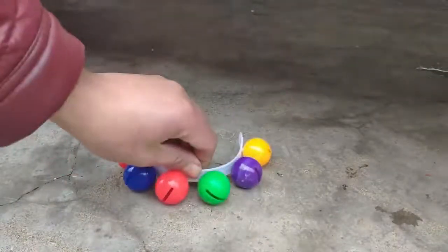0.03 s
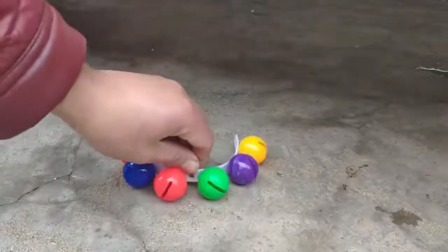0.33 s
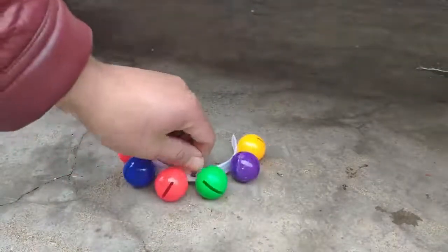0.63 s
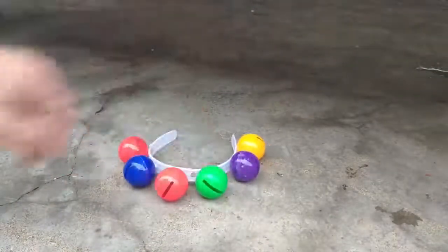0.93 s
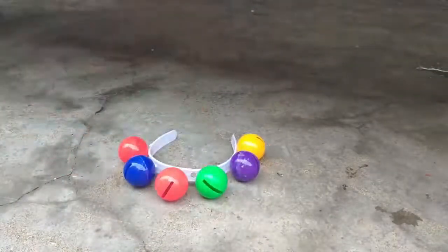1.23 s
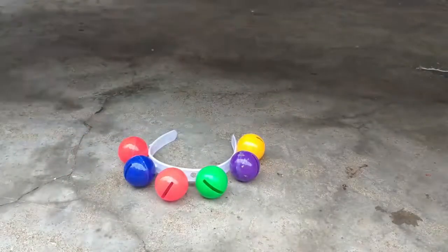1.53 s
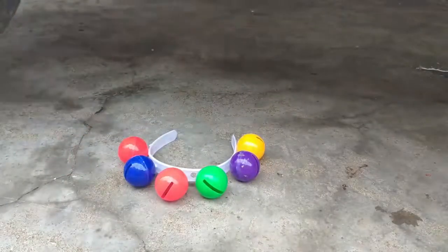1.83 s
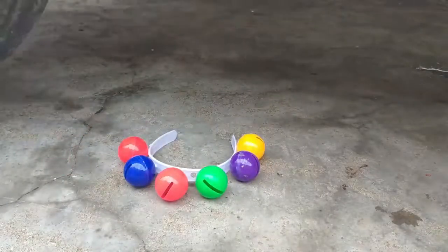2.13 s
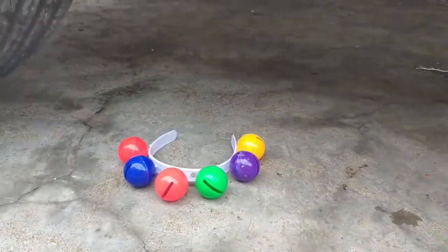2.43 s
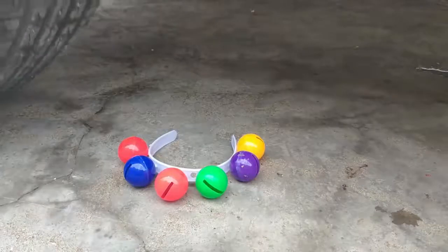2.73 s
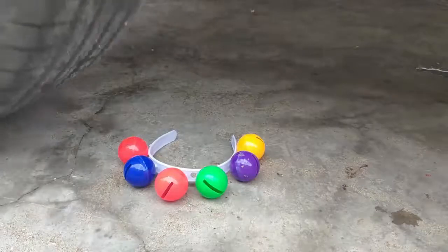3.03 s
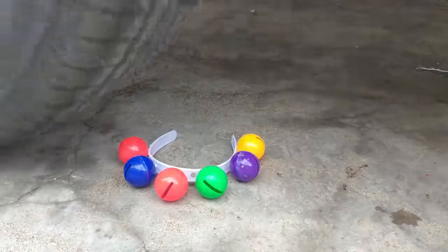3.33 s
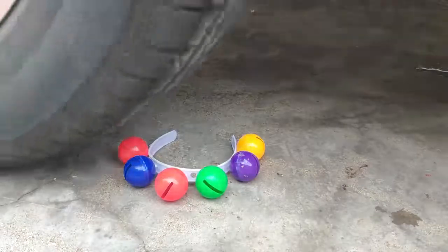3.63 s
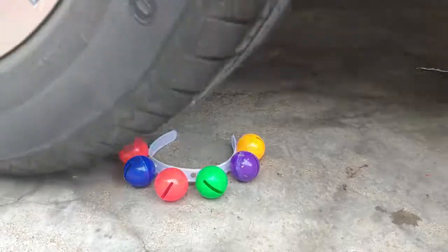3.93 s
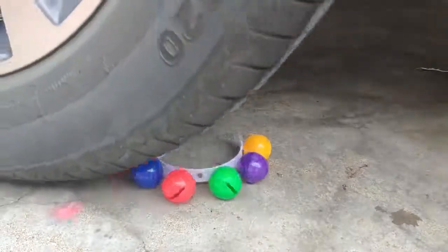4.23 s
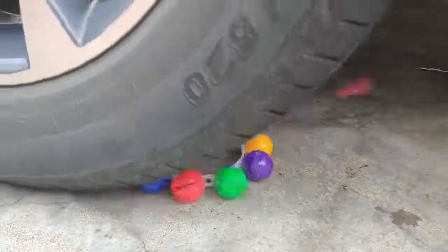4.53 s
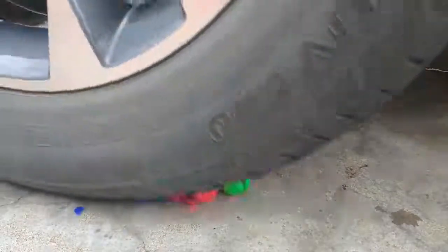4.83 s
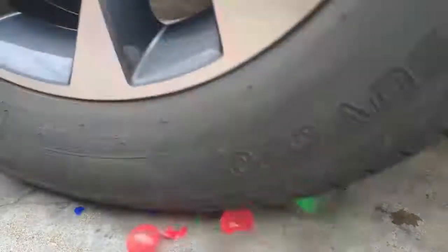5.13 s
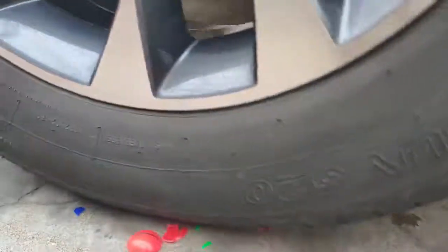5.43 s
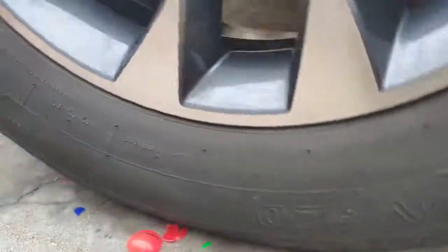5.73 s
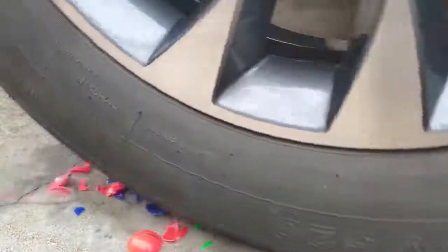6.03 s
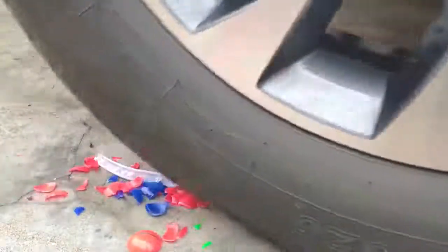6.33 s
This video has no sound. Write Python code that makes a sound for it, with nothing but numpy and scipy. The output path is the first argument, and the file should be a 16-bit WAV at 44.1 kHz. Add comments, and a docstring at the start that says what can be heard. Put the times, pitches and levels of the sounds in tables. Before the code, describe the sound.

Hollow clacks and a light rattle of bells sound as a plastic bracelet lands on concrete, over a car's soft idle. The engine takes up load with a low drone and faint whirr. Then the hard balls snap one after another under the tyre, each crack echoing briefly beneath the car, and thin out into crunching splinters. The loudest blows make the close microphones thump and choke, left and right separately.

```python
"""A car tyre bursts the small hard bell balls of a bracelet one by one and grinds the shards.
First the bracelet is set down on concrete and jingles; the car idles, then creeps up under load.
Each shell snaps, the tyre thuds down on it, and the crack rings on beneath the car.
The blows overload both close microphones, which thump and choke for moments, each on its own."""
import sys
import numpy as np
from scipy import signal
from scipy.fft import rfft, irfft, next_fast_len
from scipy.io import wavfile
from scipy.ndimage import map_coordinates

SR = 44100
rng = np.random.default_rng(int(sys.argv[2]) if len(sys.argv) > 2 else 0)


def materialize(psi):
    """Save the field psi as 16-bit PCM at rate SR to the path in sys.argv[1].

    A 1-D psi becomes a single channel; in a 2-D psi each row is a channel.
    """
    bounded = np.clip(np.atleast_2d(psi).T, -1, 1)
    quanta = np.round(bounded * 32767).astype(np.int16)
    wavfile.write(sys.argv[1], SR, quanta)


N = 285327

# modes of one ball: pitch_hz, level_db, t60_s
LOW_BELL = [(2400, 5, 0.15), (2940, -18, 0.148), (5820, 4.5, 0.13)]
# a ball tuned slightly higher: pitch_hz, level_db, t60_s
HIGH_BELL = [(2424, 2.5, 0.084), (2515, -2.5, 0.055), (6120, -10, 0.13), (8240, -6.5, 0.077),
             (10350, -17, 0.072)]
# a shell or large shard breaks: start_s, strength_db, left_minus_right_db, tilt_db_per_octave
CRACKS = [(4.1526, -14, -2, 2), (4.1806, -1.5, 3, -1.7), (4.25, -16.5, 8, -0.5), (4.264, -8, -14, -3.8),
          (4.2919, -6, 8, -1), (4.471, -22.5, 37, -3), (4.5187, -11.5, -3.5, 0), (4.542, -6.5, -5, -2.5),
          (4.5678, -12, 15, -3.5), (4.613, -20.5, 23, -1), (4.6227, -10.5, -10, 2), (4.6286, -8, 9, -2.5),
          (4.7499, -3, 7, -3), (4.782, -19, -47, -4), (4.8237, -21, -38, -2), (4.852, -16.5, -23, -2),
          (4.9038, -12, 3.5, -1.5), (4.917, -3, 7, -1), (4.992, -25, 22, -1.5), (5.0062, -15.5, 19, -2.5),
          (5.017, -10.5, -14, -2), (5.0391, -2.5, 21, -1.5), (5.0486, -15, 0, -2), (5.051, -10, 15, -3),
          (5.073, -5, -37, -4.5), (5.08, -18, -19, -4), (5.0972, -21, -35, -8), (5.107, 8, -16.5, -2),
          (5.124, -11.5, -12, -5.5), (5.1571, -2, -17, -4), (5.168, -15, -25, -4), (5.1831, 2.5, -12, -5),
          (5.2045, -5.5, 1, 0), (5.251, 3.5, 2.5, 0), (5.2925, -5, -13, -0.5), (5.2966, -10.5, 4, -4.5),
          (5.3272, -1, -7, -1.5), (5.352, -11, -5, -2.5), (5.368, -1, -2.5, 0), (5.4007, -4, -6, -0.5),
          (5.4207, -12, -8, 3), (5.4403, -9.5, 10, -0.5), (5.4542, -19, 25, 2), (5.5087, -12.5, 27, 0),
          (5.527, -12.5, -2, -4.5), (5.5386, -7, 14, -1), (5.557, -5, 18, 0), (5.583, -18, 13, -0.5),
          (5.5999, -11, 26, 1), (5.622, -25, 34, -2), (5.6588, -8, -1, -2), (5.6642, -11.5, -10, -2),
          (5.714, -9.5, 2.5, -4), (5.724, -11, -2, -3), (5.7295, -10, 8, 0.5), (5.7757, -11.5, -1.5, -1),
          (5.782, -4.5, -3, 0), (5.7906, -9, -8, -7), (5.8042, -13.5, -7, -0.5), (5.8535, -19, -5, -3),
          (5.8763, -8.5, 5, -1.5), (5.8943, -17.5, 20, -6), (5.944, -15.5, -9, 4), (5.965, -18, -8, -5),
          (5.9826, -12.5, -2, 3.5), (6.009, -15, -11, -0.5), (6.047, -10.5, -6, -2.5),
          (6.131, -15, -11, -1.5), (6.2625, -21, -6, -4)]
SNAP_CEILING_DB = -8  # stronger cracks snap no louder, they only echo more


def amp(db):
    """Decibels to gain."""
    return 10 ** (np.asarray(db) / 20)


def unit(x):
    """Scale to rms 1."""
    return x / np.sqrt(np.mean(x ** 2) + 1e-20)


def along(points, hz):
    """Interpolate (hz, value) points on a log axis."""
    knots_hz, values = np.transpose(points)
    return np.interp(np.log(hz + 1), np.log(knots_hz + 1), values)


def curves(rows):
    """One value per sample for each column after the time."""
    time_s, *columns = np.transpose(rows)
    return [np.interp(np.arange(N) / SR, time_s, column) for column in columns]


def wobble(knots_per_s):
    """Smooth random curve."""
    knots = rng.standard_normal(int(N * knots_per_s / SR) + 4)
    return map_coordinates(knots, [np.arange(N) * knots_per_s / SR])


def scattered(length_s, per_s):
    """Uneven times within length_s."""
    count = int(length_s * per_s)
    return (np.arange(count) + rng.uniform(size=count)) / per_s


def filtered(x, response):
    """Multiply the spectrum by response(hz)."""
    n = x.shape[-1]
    size = next_fast_len(n + SR // 10)
    return irfft(rfft(x, size) * response(np.fft.rfftfreq(size, 1 / SR)), size)[..., :n]


def causal(x, gain_db):
    """Minimum-phase filter; attacks stay sharp."""
    n = x.shape[-1]
    size = 2 * next_fast_len(n)
    cepstrum = irfft(np.log(amp(gain_db(np.fft.rfftfreq(size, 1 / SR)))), size)
    cepstrum[..., 1:size // 2] *= 2
    cepstrum[..., size // 2 + 1:] = 0
    return irfft(rfft(x, size) * np.exp(rfft(cepstrum)), size)[..., :n]


def add(track, start_s, sound):
    """Mix a sound into the track."""
    part = track[..., max(round(start_s * SR), 0):][..., :sound.shape[-1]]
    part += sound[..., :part.shape[-1]]


def heard_from_bay(pair):
    """The left microphone catches far less of the engine bay's top treble than the right."""
    # bay balance: freq_hz, left_minus_right_db
    balance = [(60, 15.5), (110, 0.5), (380, -3), (3700, -2), (6300, 2.5), (8120, -21), (9500, -24),
               (14000, -17)]
    return filtered(pair, lambda hz: np.sqrt(2 / (1 + amp(np.outer([-2, 2], along(balance, hz))))))


def fan(load_s, rise_s=0.047, idle_db=-41, load_db=-39.5, flutter_db=1.02, blade_hz=518, blade_db=-56):
    """Air rushes in the engine bay, alike on both sides in the bass, diffuse above; faint blade tone."""
    # rush spectrum: freq_hz, density_db
    colour = [(60, -18.5), (110, -2.5), (200, -5.5), (260, -11), (360, -8.5), (500, -5.5), (1040, -19),
              (1700, -14), (2600, -19), (3600, -18), (6600, -25), (8500, -17.5), (10000, -26.5),
              (15800, -28)]
    # likeness of left and right: freq_hz, correlation
    coherence = [(60, 0.99), (240, 0.98), (950, 0.02)]

    def mid_side_gain(hz):
        angle = np.arccos(along(coherence, hz)) / 2
        return amp(along(colour, hz)) * np.array([np.ones_like(hz), np.tan(angle)])

    mid, side = filtered(rng.standard_normal((2, N)), mid_side_gain)
    rush = unit(heard_from_bay(np.array([mid + side, mid - side])))
    blade_gain = amp(blade_db + 1.9 * wobble(3.6))
    blades = blade_gain * np.sin(2 * np.pi * np.cumsum(blade_hz + 2 * wobble(10)) / SR)
    level_db, = curves([(load_s, idle_db), (load_s + rise_s, load_db)])
    return blades + rush * amp(level_db + flutter_db * wobble(24.9))


def engine(load_s, idle_hz=92.1, left_delay_s=0.00045):
    """Firing orders; under load the fourth meets the exhaust resonance and swells with whirr and whine."""
    # exhaust boom under load: time_s, pitch_hz, level_db
    loaded = [(1.51, 135.3, -35), (1.69, 135.6, -34.5), (2.03, 129.8, -41.5), (2.57, 133.2, -35.5),
              (2.71, 129.8, -42.5), (3.32, 129.9, -40.5), (3.64, 137.1, -38), (4.12, 134.8, -37)]
    # boom past the bracelet: time_s, pitch_hz, level_db
    rolling_off = [(5.901, 135.4, -42.5), (6.4, 136, -36)]
    # weaker orders: firing_multiple, level_db
    orders = [(1, -5.5), (2, -14), (6, -14.5), (9, -18.5)]
    # belt-driven parts: boom_multiple, level_db
    belt_tones = [(12.2, -58), (13.4, -57), (15.68, -56)]
    # drive whirr spectrum: freq_hz, density_db
    whirr_colour = [(900, -11), (1300, 8), (1750, 11), (2200, 8.5), (2600, -8.5), (9800, -7.5), (11400, 1),
                    (13000, -7)]
    boom_hz, level_db = curves([(load_s, idle_hz, -55), *loaded, *rolling_off])
    effort_db = level_db - level_db.max()
    firing_phase = 2 * np.pi * np.cumsum(boom_hz / 4 * (1 + 0.002 * wobble(12))) / SR
    boom = amp(level_db - 2 + 0.54 * wobble(25)) * np.sin(4 * firing_phase)
    drone = sum(amp(db - 40 + wobble(10)) * np.sin(k * firing_phase + rng.uniform(0, 2 * np.pi))
                for k, db in orders)
    whine = sum(amp(db + effort_db + 3 * wobble(6.9)) * np.sin(4 * k * firing_phase)
                for k, db in belt_tones)
    hum = np.sqrt(2) * (boom + drone + whine)
    pair = filtered(hum, lambda hz: np.exp(-2j * np.pi * np.outer([left_delay_s, 0], hz)))
    whirr = unit(filtered(rng.standard_normal((2, N)), lambda hz: amp(along(whirr_colour, hz))))
    throb = 1 + 0.31 * np.sin(firing_phase)
    whirr *= throb * amp(-44 + 0.58 * effort_db + 1.2 * wobble(13))
    return pair * amp([[-1], [1]]) + heard_from_bay(whirr)


def set_down(t60_s=0.088):
    """The balls meet the concrete with brief, hollow clacks."""
    # ground contacts: start_s, level_db
    contacts = [(0.017, -26), (0.027, -21), (0.052, -23)]
    # clack spectrum: freq_hz, density_db
    colour = [(700, -38), (1700, 6.5), (2300, 14), (3500, -8), (9000, -18), (15000, -20)]
    out, t = np.zeros((2, N)), np.arange(SR // 10) / SR
    for start_s, db in contacts:
        clack = unit(filtered(rng.standard_normal((2, len(t))), lambda hz: amp(along(colour, hz))))
        add(out, start_s, amp(db - 60 * t / t60_s) * clack)
    return out


def bell_strike(modes, upper_db, detune=0.0081, scatter_db=6, rise_s=0.0007):
    """A slit ball rings, roughened by its chattering pellet; where that lands weights the upper modes."""
    t = np.arange(SR // 4) / SR
    ring = np.zeros((2, len(t)))
    for hz, db, t60_s in modes:
        chatter = np.interp(t, np.linspace(0, t[-1], 100), 0.4 * rng.standard_normal(100))
        pitch_hz = hz * (1 + detune * rng.uniform(-1.35, 1))
        phase = 2 * np.pi * pitch_hz * t + chatter + rng.uniform(0, 2 * np.pi, (2, 1))
        mode_db = db + (hz > 4000) * (upper_db + scatter_db * rng.uniform(-1, 1))
        ring += amp(mode_db - 60 * t / t60_s) * np.sin(phase)
    return ring * (1 - np.exp(-t / rise_s))


def bells(gain_db=-7, contacts_per_s=115, scatter_db=2):
    """Pellets strike their bells hard, then rattle lightly as the balls settle."""
    # hard strikes: start_s, level_db, upper_modes_db, ball
    jingles = [(0.025, -15, -24, LOW_BELL), (0.0563, -13, -10, HIGH_BELL), (0.079, -26, 7.5, HIGH_BELL),
               (0.3247, -27, -16, HIGH_BELL), (0.43, -22, -15, HIGH_BELL), (0.666, -38, 13, HIGH_BELL),
               (4.253, -12.5, -12, LOW_BELL), (4.3032, -7.5, -19, LOW_BELL), (4.3404, -12, -16, LOW_BELL),
               (4.349, -16.5, 1, LOW_BELL), (4.719, -20, -26, LOW_BELL)]
    # loose pellets: start_s, length_s, contact_db
    rattles = [(0.051, 0.04, -23), (0.099, 0.74, -37.5), (0.19, 0.055, -30.5), (0.451, 0.03, -29),
               (0.58, 0.045, -30.5), (4.464, 0.055, -29)]
    out = np.zeros((2, N))
    for start_s, db, upper_db, ball in jingles:
        add(out, start_s, amp(db + gain_db) * bell_strike(ball, upper_db))
    for start_s, length_s, db in rattles:
        for wait_s in scattered(length_s, contacts_per_s):
            gain = amp(db + gain_db + scatter_db * rng.standard_normal())
            add(out, start_s + wait_s, gain * bell_strike(HIGH_BELL, upper_db=-10))
    return out


def crack_colour_db(hz):
    """Spectrum of breaking shells at each microphone."""
    # left: freq_hz, density_db
    left = [(30, 3), (100, -4.5), (250, 7), (600, -0.5), (950, 1), (1250, -3), (1650, -3), (2400, -6),
            (4000, -4), (6500, -1.5), (7800, -9), (8900, -13), (10000, -18), (12000, -14.5), (15000, -4.5)]
    # right: freq_hz, density_db
    right = [(30, -23.5), (100, 7), (250, 0.5), (600, -1.5), (900, -3.5), (1250, -11.5), (1650, -9),
             (2400, -10), (4000, -11.5), (6500, -14.5), (7800, -6.5), (8900, 3), (10000, -9.5),
             (12000, -4.5), (15000, -7)]
    return np.array([along(left, hz), along(right, hz)])


def shard_colour(start_s, shell_hz=3570, flatten_s=0.13):
    """A random fragment's resonances, dB against Hz; the shells' hollow note fades as they flatten."""
    broad_hz = 2900 * np.exp(0.66 * rng.standard_normal((3, 1)))
    narrow_hz = rng.uniform(1000, 12000, size=(10, 1))
    shell_db = 9 * np.exp(-(start_s - CRACKS[0][0]) / flatten_s)

    def gain_db(hz):
        hump = lambda centre_hz: np.exp(-(np.log((hz + 1) / centre_hz) / 0.25) ** 2)
        modes_db = 7 / (1 + ((hz - narrow_hz) / 70) ** 2).min(0)
        return shell_db * hump(shell_hz) + 4 * hump(broad_hz).max(0) + modes_db

    return gain_db


def octaves(hz):
    """Octaves from the pivot of a fracture's spectral tilt."""
    return np.log2(np.clip(hz, 700, 10000) / 2500)


def snap(shard_db, tilt, mic_gain, t60_s=0.014, rise_s=0.00013):
    """Dry fracture noise, coloured by the freed shard; a choked microphone cuts it short."""
    t = np.arange(SR // 20) / SR
    noise = rng.standard_normal(len(t)) + 0.93 * rng.standard_normal((2, len(t)))
    colour = lambda hz: amp(crack_colour_db(hz) + 0.51 * shard_db(hz) + tilt * octaves(hz))
    choked_t60_s = t60_s * mic_gain ** 0.15
    burst = filtered(noise, colour) * amp(-60 * t / choked_t60_s) * (1 - np.exp(-t / rise_s))
    return burst / burst[:, :SR // 400].std(axis=1, keepdims=True)


def front(tilt, centre_hz=3880, spread=0.63):
    """The shard springs free: a steep swing that dies in a few cycles, faster for brighter cracks."""
    hz = centre_hz * 2 ** (0.23 * tilt) * np.exp(spread * rng.uniform(-1.01, 1, (2, 1)))
    cycles = hz * np.arange(SR // 100) / SR
    return np.sin(2 * np.pi * cycles) * np.exp(0.5 - 2 * cycles)


def under_car_echo(shard_db, tilt, grain_db=4, rise_s=0.00062):
    """A crack echoes between tyre and ground, grainy with splinters; each pitch dies at its own rate."""
    # decay under the car: freq_hz, t60_s
    decay = [(150, 0.066), (1000, 0.14), (15000, 0.18)]
    n = SR // 6
    t = np.arange(n) / SR
    grains = np.repeat(rng.standard_normal((2, n)), SR // 1000, axis=1)[:, :n]
    noise = rng.standard_normal((2, n)) * amp(grain_db * grains)
    bins_hz, age_s, spectra = signal.stft(noise, SR, nperseg=128)
    spectra *= amp(-60 * age_s / along(decay, bins_hz)[:, None])
    echo = signal.istft(spectra, SR, nperseg=128)[1][:, :n] * (1 - np.exp(-t / rise_s))
    echo = causal(echo, lambda hz: crack_colour_db(hz) + shard_db(hz) + 0.87 * tilt * octaves(hz))
    return echo / echo[:, :SR // 50].std(axis=1, keepdims=True)


def cracks(mic_gain, snap_db=-2, front_db=7.5, echo_db=-10):
    """Each fracture gives a snap, a steep front and an echo; returns direct sound and echoes apart."""
    direct, echoes = np.zeros((2, N)), np.zeros((2, N))
    for start_s, db, side_db, tilt in CRACKS:
        shade_db = np.minimum([[side_db], [-side_db]], 0)
        direct_db = min(db, SNAP_CEILING_DB) + shade_db
        shard_db = shard_colour(start_s)
        onset_gain = mic_gain[:, round(start_s * SR), None]
        add(direct, start_s, snap(shard_db, tilt, onset_gain) * amp(direct_db + snap_db))
        add(direct, start_s, front(tilt) * amp(direct_db + front_db))
        add(echoes, start_s, under_car_echo(shard_db, tilt) * amp(db + shade_db + echo_db))
    return direct, echoes


def tyre_thuds(centre_hz=191, spread=0.35, t60_s=0.015):
    """The rubber drops as each shell gives way: a dull pop of little more than one swing."""
    # weaker once the shells lie flat: time_s, level_re_crack_db
    drop = [(5.4, -2), (5.75, -13)]
    out, t = np.zeros(N), np.arange(SR // 10) / SR
    for start_s, db, _, _ in CRACKS:
        pitch_hz = centre_hz * np.exp(spread * rng.standard_normal())
        level_db = min(db, SNAP_CEILING_DB) + np.interp(start_s, *np.transpose(drop))
        add(out, start_s, -amp(level_db - 60 * t / t60_s) * np.sin(2 * np.pi * pitch_hz * t))
    return out


def mic_thumps(overloads, rise_s=0.001, width_s=0.0034, creep_share=0.39, recovery_s=0.062):
    """Overload throws a microphone off centre: a one-sided bump, then a slow creep back."""
    out, t = np.zeros(N), np.arange(SR // 2) / SR
    bump = np.exp(-(t / width_s) ** 4)
    creep = (1 - t / (3 * recovery_s)) * np.exp(-t / recovery_s)
    shape = (1 - np.exp(-(t / rise_s) ** 2)) * ((1 - creep_share) * bump + creep_share * creep)
    for start_s, push, _ in overloads:
        add(out, start_s, push * shape)
    return out


def mic_choke(overloads, wait_s=0.0038, max_loss_db=45, sink_db_per_s=5999, recover_db_per_s=1895):
    """A microphone's gain sinks just after an overload, then climbs back."""
    t, loss_db = np.arange(N) / SR, np.zeros(N)
    for start_s, _, choke_s in overloads:
        sinking_db = sink_db_per_s * (t - start_s - wait_s)
        recovering_db = recover_db_per_s * (start_s + choke_s - t)
        loss_db = np.maximum(loss_db, np.minimum(sinking_db, recovering_db))
    return amp(-np.minimum(loss_db, max_loss_db))


def splinters(per_s=60, centre_hz=3500, spread=0.77, tick_t60_s=0.0071, echo_t60_s=0.059, echo_db=-1):
    """Ground fragments snap at random: dry ticks of scattered pitch in a short echo under the car."""
    # the tyre grinds the shards: time_s, level_db
    grind = [(5.101, -25), (5.25, -13.5), (5.43, -11.5), (5.49, -27), (5.57, -23.5), (5.65, -44),
             (5.79, -24), (5.92, -33.5), (6.09, -25.5), (6.35, -29)]
    time_s, grind_db = np.transpose(grind)
    ticks, t = np.zeros((2, N)), np.arange(SR // 50) / SR
    for start_s in time_s[0] + scattered(time_s[-1] - time_s[0], per_s):
        side, pitch = np.clip(rng.standard_normal(2), -2, 2)
        tone = np.sin(2 * np.pi * centre_hz * np.exp(spread * pitch) * t)
        tick = rng.standard_normal((2, len(t))) + 0.48 * tone
        level_db = np.interp(start_s, time_s, grind_db) + side * np.array([[4], [-4]])
        add(ticks, start_s, tick * amp(level_db - 60 * t / tick_t60_s))
    age_s = np.arange(SR // 6) / SR
    tail = rng.standard_normal((2, len(age_s))) * amp(-60 * age_s / echo_t60_s)
    echo = signal.fftconvolve(ticks, tail / np.linalg.norm(tail[0]), axes=1)[:, :N]
    colour = lambda hz: np.array([unit(amp(mic_db)) for mic_db in crack_colour_db(hz)])
    return filtered(ticks + amp(echo_db) * echo, colour)


def scene():
    """Only direct cracks, tyre thuds and its own thumps get through a choked microphone."""
    # left microphone overloads: start_s, push_re_full_scale, choke_s
    left = [(4.543, 0.69, 0.077), (4.622, -0.33, 0.1), (4.719, 0.72, 0.034), (4.748, 0.8, 0.1),
            (4.842, -0.8, 0.16), (5.048, 0.38, 0.075), (5.123, -0.38, 0), (5.155, -0.081, 0.034),
            (5.203, -0.13, 0.037), (5.25, 0.92, 0.022), (5.367, -0.57, 0.017), (5.441, 0.28, 0)]
    # right microphone overloads: start_s, push_re_full_scale, choke_s
    right = [(4.181, 0.6, 0.07), (4.263, 0.9, 0.035), (4.291, -0.14, 0.11), (4.397, 0.83, 0.1),
             (4.544, 0.27, 0.081), (4.628, -0.71, 0.093), (4.721, 0.46, 0.23), (4.851, -0.61, 0.099),
             (4.917, 0.58, 0.093), (5.01, 0.68, 0.11), (5.129, -0.86, 0.028), (5.169, -0.0011, 0.021),
             (5.441, 0.52, 0.062), (5.53, -0.57, 0.0089), (5.565, -0.17, 0.087), (5.656, 0.91, 0.053)]
    load_s = 1.485  # the engine takes up the load
    mic_gain = np.array([mic_choke(left), mic_choke(right)])
    thumps = np.array([mic_thumps(left), mic_thumps(right)])
    direct, echoes = cracks(mic_gain)
    car = fan(load_s) + engine(load_s)
    blows = direct + tyre_thuds() + thumps
    return blows + mic_gain * (echoes + car + set_down() + bells() + splinters())


def record(dry, ceiling=0.85, top_hz=16000):
    """The input stage rounds off the peaks; nothing passes above the band limit."""
    clipped = dry / (1 + (dry / ceiling) ** 4) ** (1 / 4)
    return filtered(clipped, lambda hz: 1 / np.sqrt(1 + (hz / top_hz) ** 300))


dry = scene()
out = record(dry)
materialize(out)
```